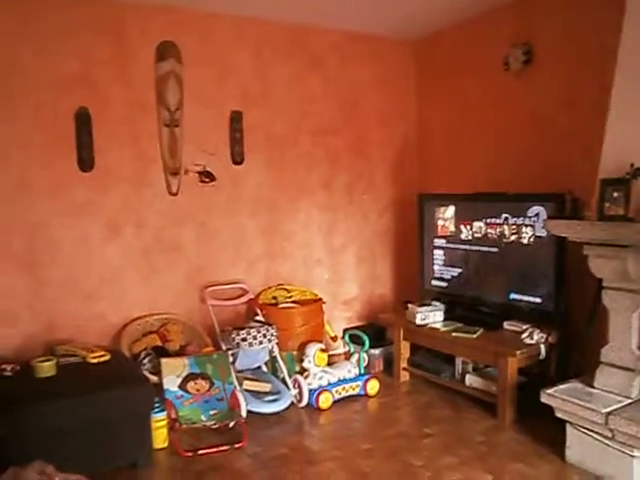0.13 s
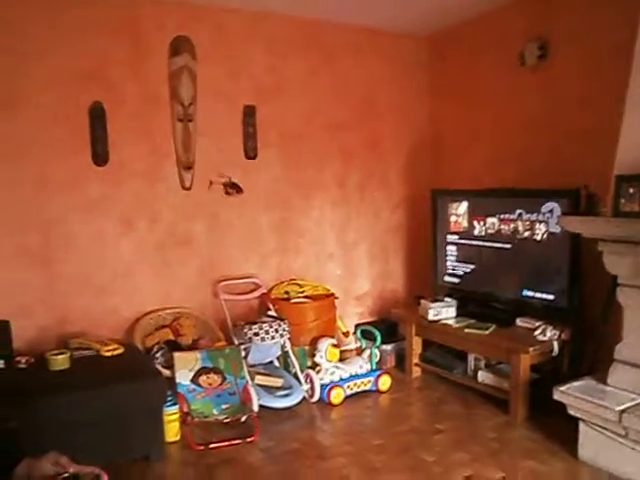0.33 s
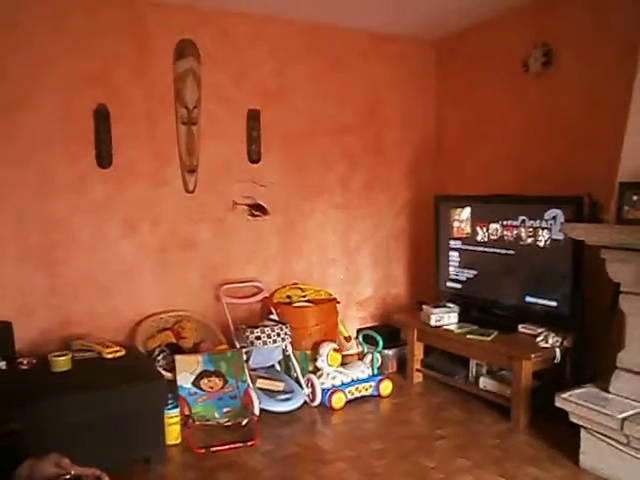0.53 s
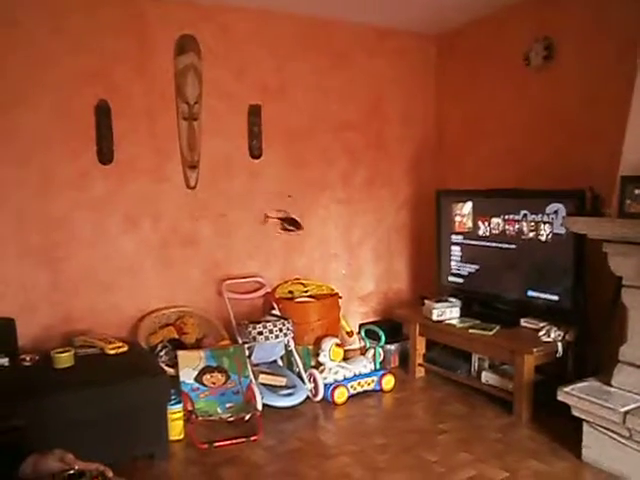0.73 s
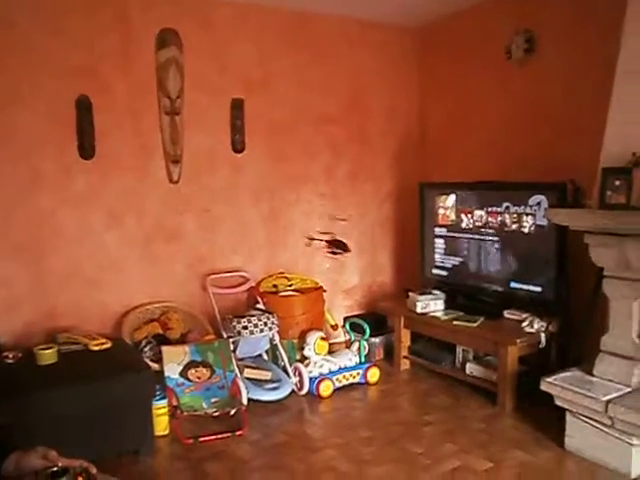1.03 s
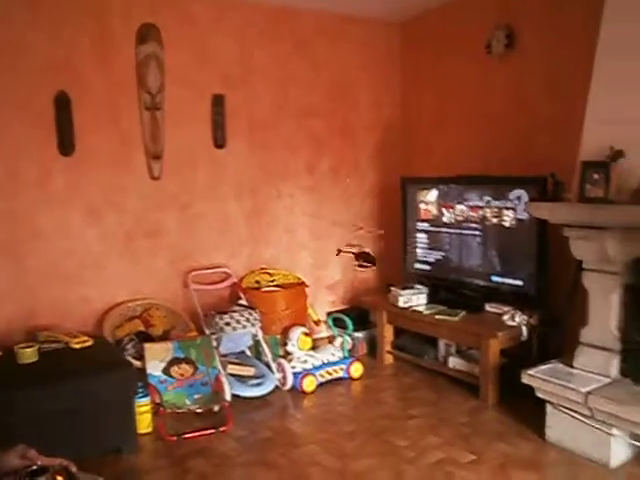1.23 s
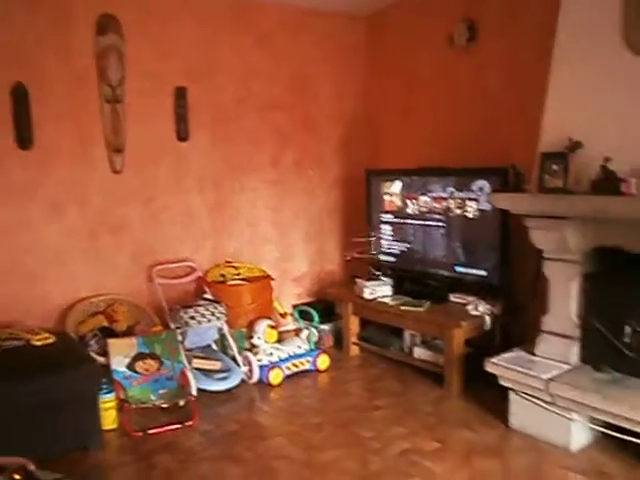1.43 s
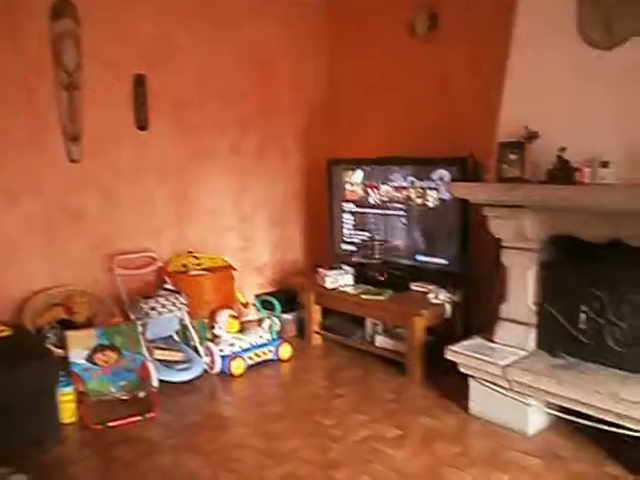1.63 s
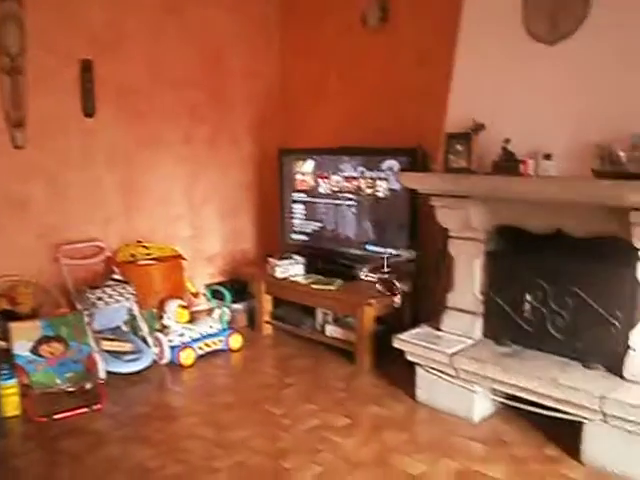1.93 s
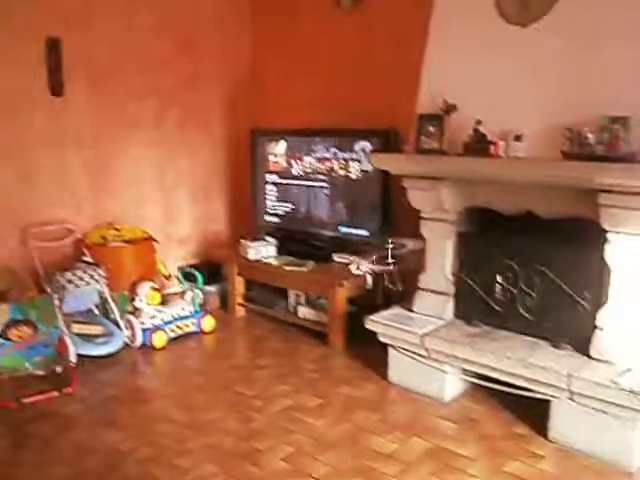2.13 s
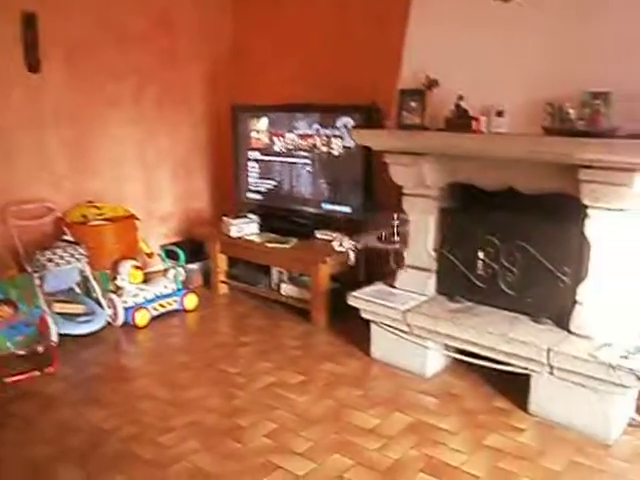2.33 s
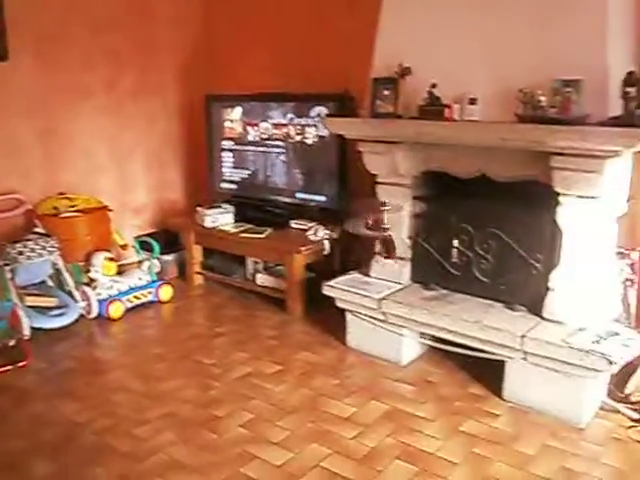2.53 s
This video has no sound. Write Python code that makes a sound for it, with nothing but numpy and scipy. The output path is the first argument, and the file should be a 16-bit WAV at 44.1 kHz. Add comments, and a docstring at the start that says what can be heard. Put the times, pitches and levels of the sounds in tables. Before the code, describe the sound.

A toy helicopter whirrs indoors with a wavering whine and a faint hum. Brief handling scuffs and ticks come close to a dull-sounding microphone, then the motor revs up a little and eases back.

```python
"""A toy helicopter flies across a tiled living room. Its main motor's pinion whines at eight times
the shaft rate, fading in and out in the room's standing waves, while a second motor hums, the blades
stir the air and the gears rasp. Brief tones swell out of the whirr. A few soft scuffs and plastic
ticks, like handling noise, sound close to a narrow-band microphone."""
import sys
import numpy as np
from scipy import signal
from scipy.fft import rfft, irfft, next_fast_len
from scipy.io import wavfile
from scipy.ndimage import map_coordinates

SR = 44100
rng = np.random.default_rng(int(sys.argv[2]) if len(sys.argv) > 2 else 0)


def to_wav(s):
    """Save 16-bit WAV."""
    ch = np.atleast_2d(s).T  # columns
    pcm = np.round(np.clip(ch, -1, 1) * 32767)  # PCM
    wavfile.write(sys.argv[1], SR, pcm.astype(np.int16))


N = 118188
T = np.arange(N) / SR

# The main motor's revs. Each row: time in seconds, shaft speed in Hz.
MAIN_SPEED = [(0, 202.4), (.55, 201), (.85, 203.2), (1.1, 203.6), (1.55, 204.7), (1.82, 204.8),
              (1.95, 212.4), (2.13, 216.9), (2.35, 214.2), (2.55, 202.3), (2.68, 198.3)]
# The whine's ride through the standing waves. Each row: time in seconds, level in dB.
WHINE_LEVEL = [(0, -48), (.12, -43.5), (.27, -39.5), (.36, -34), (.5, -46), (.59, -34.5), (.69, -43.5),
               (.74, -39.5), (.84, -46.5), (1.0, -35), (1.14, -44.5), (1.26, -38.5), (1.4, -55.5),
               (1.49, -37), (1.6, -44.5), (1.68, -37), (1.78, -49.5), (1.96, -40.5), (2.02, -43),
               (2.13, -35), (2.25, -54), (2.38, -38), (2.49, -36.5), (2.53, -44.5), (2.6, -36.5),
               (2.68, -52)]
# Faint fading tones around the whine, including a ring near 1270 Hz, here moving with motor speed.
# Each row: pitch in Hz per Hz of motor speed, level in dB.
FAINT_TONES = [(4, -55), (6.2, -51.5), (7.4, -57), (8.55, -55.5), (10.7, -58.5), (12, -55.5), (15.2, -55)]
# The second rotor's motor. Each row: time in seconds, shaft speed in Hz, fundamental's level in dB.
HUM_PATH = [(0, 204.5, -55.5), (.13, 204.5, -51.5), (.3, 204, -49), (.52, 204, -58.5), (1.0, 203.5, -60.5),
            (1.15, 203.6, -51.5), (1.76, 204, -52), (1.86, 204, -62), (1.96, 210.5, -46),
            (2.15, 213.5, -48), (2.42, 210, -45), (2.49, 208, -56.5), (2.6, 203, -47.5), (2.68, 200, -51)]
# The hum's overtones. Each row: harmonic number, level in dB against the fundamental.
HUM_OVERTONES = [(2, -5.5), (3, -5), (6, -6.5)]
# Air stirred by the blades, with the room's rumble. Each row: frequency in Hz, relative level in dB.
WASH_EQ = [(15, -31), (28, -20.5), (55, -14.5), (85, -15), (115, -10), (170, -9.5), (290, -7.5), (370, -10),
           (520, -7.5), (680, -3), (950, -1), (1300, -2), (1520, -3), (1750, -5), (1950, -10),
           (4000, -15.5)]
# The rasp of gears and brushes. Each row: frequency in Hz, relative level in dB.
RASP_EQ = [(300, -41), (1400, -2), (1950, -7), (2200, -3), (2700, -2.5), (3100, -0.5), (3400, -2),
           (3750, -1.5), (4000, -5.5), (4400, -10)]
# Soft rubs. Each row: peak time, rise and decay time constants, all in seconds, centre pitch in Hz,
# body level in dB, treble level in dB.
SCUFF_CUES = [(0.341, .008, 0.0056, 1240, -31.5, -46), (.371, .009, .022, 1220, -26, -34.5),
              (.432, 0.011, 0.023, 1002, -33.5, -41), (.798, 0.0026, 0.0041, 1200, -31, -41.5),
              (.853, 0.009, .008, 1307, -36.5, -35), (.872, 0.0027, 0.0032, 1210, -25.5, -39.5),
              (0.881, 0.0061, 0.011, 1094, -33, -27.5), (1.152, 0.016, 0.0092, 1218, -33, -47.5),
              (1.458, .012, 0.0098, 1250, -38.5, -47)]
# A scuff's pitched body. Each row: multiple of its centre pitch, relative level in dB.
SCUFF_BODY_EQ = [(.2, -53.5), (.65, -17.5), (.88, -4), (1, 1.5), (1.14, -5), (1.45, -22), (3.3, -34)]
# A scuff's scratchy top. Each row: frequency in Hz, relative level in dB.
SCUFF_TREBLE_EQ = [(200, -42), (900, -11), (1700, -3), (2600, -5), (3150, 1.5), (3700, -5.5), (4400, -16)]
# Ticks within the scuffs. Each row: start in seconds, strike level in dB.
TICK_CUES = [(.368, -21.5), (0.4301, -19)]
# The plastic they ring. Each row: pitch in Hz, level in dB against the strike, seconds to fall 60 dB.
PLASTIC_MODES = [(1070, -10.5, .022), (1317, -9, 0.03), (3000, -13, .008)]
# Tones in the whirr. Each row: peak time in seconds, half-width in seconds, pitch in Hz, level in dB.
SWELL_CUES = [(0.548, 0.11, 852, -43), (1.343, 0.053, 1755, -44.5), (1.474, 0.093, 1273, -42.5),
              (1.876, 0.078, 622, -49)]
# The microphone's treble roll-off. Each row: frequency in Hz, gain in dB.
MICROPHONE_EQ = [(3950, 0), (4150, -4.5), (4330, -14.5), (4500, -29), (4700, -55.5)]

PINION_TEETH, WHINE_JITTER_HZ = 8, 1.28
WHINE_ECHO_DB, WHINE_FLUTTER_DB = -13, 1.2
FADES_PER_S = 7  # pace at which faint tones and hum overtones drift in level
WASH_DB, RASP_DB = -35, -34.5  # halfway through, at average speed
WASH_DB_PER_S, RASP_DB_PER_S = 0.38, 1  # growth as the toy comes nearer
EFFORT_DB_PER_HZ = 0.0479  # more shaft speed, more noise
BLADE_PASSES_PER_TURN, CHOP_DEPTH, RASP_DEPTH = .27, 0.1, 0.21
SWELL_WAVER_HZ = 9
ROOM_T60_S, ROOM_DB = 0.14, -12.5


def amp(db):
    """Decibels to gain."""
    return 10 ** (np.asarray(db) / 20)


def unit(x):
    """Scale to rms 1."""
    return x / np.sqrt(np.mean(x ** 2) + 1e-20)


def automation(rows):
    """One sample-by-sample curve for each column after the time."""
    times, *columns = np.transpose(rows)
    return [np.interp(T, times, column) for column in columns]


def wobble(rate):
    """A smooth random curve through rate points a second."""
    return map_coordinates(rng.standard_normal(512), [T * rate + 2], mode="wrap")


def equalise(x, points, top_hz=SR):
    """Filter by (Hz, dB) points on a log axis, with nothing above top_hz."""
    size = next_fast_len(N + 8192)
    hz = np.fft.rfftfreq(size, 1 / SR)
    point_hz, point_db = np.transpose(points)
    gain = amp(np.interp(np.log(hz + 1), np.log(point_hz), point_db)) * (hz < top_hz)
    return irfft(rfft(x, size) * gain, size)[:N]


def noise(points, pulse=1):
    """Noise of rms 1, pulsed before it is equalised."""
    return unit(equalise(pulse * rng.standard_normal(N), points))


def angle(hz):
    """Running phase of a frequency, in radians."""
    return 2 * np.pi * np.cumsum(hz) / SR


def room(x):
    """The tiled room adds a short diffuse tail."""
    tail = rng.standard_normal(N) * np.exp(-np.log(1000) * T / ROOM_T60_S)
    return x + amp(ROOM_DB) * signal.fftconvolve(x, tail / np.linalg.norm(tail))[:N]


def fading_tone(phase):
    """A tone of rms 1 that arrives by many shifting paths through the room."""
    return unit(wobble(FADES_PER_S) * np.cos(phase) + wobble(FADES_PER_S) * np.sin(phase))


def main_motor(speed):
    """The pinion's teeth whine, blurred by the room."""
    level_db, = automation(WHINE_LEVEL)
    gain = amp(level_db + WHINE_FLUTTER_DB * wobble(40))
    tooth_hz = PINION_TEETH * speed + WHINE_JITTER_HZ * wobble(30)
    whine = gain * unit(np.sin(angle(tooth_hz)))
    echo = unit(room(whine) - whine) * whine.std() * amp(WHINE_ECHO_DB)
    return whine + echo


def faint_tones(speed):
    """Faint tones fade in and out around the whine, their pitch moving with motor speed."""
    return sum(amp(db) * fading_tone(ratio * angle(speed)) for ratio, db in FAINT_TONES)


def second_motor():
    """An unbalanced shaft hums once a turn, with a few overtones that drift in level."""
    speed, level_db = automation(HUM_PATH)
    shaft = angle(speed)
    overtones = sum(amp(db + 2.1 * wobble(FADES_PER_S)) * unit(np.sin(harmonic * shaft))
                    for harmonic, db in HUM_OVERTONES)
    return amp(level_db) * (unit(np.sin(shaft)) + overtones)


def rotors(speed):
    """Blades chop the air and gears rasp once a motor turn; both grow with speed and nearness."""
    shaft, since_middle = angle(speed), T - T.mean()
    blade_pulse = 1 + CHOP_DEPTH * np.sin(BLADE_PASSES_PER_TURN * shaft)
    gear_pulse = 1 + RASP_DEPTH * np.sin(shaft)
    wash = noise(WASH_EQ, blade_pulse) * amp(WASH_DB + WASH_DB_PER_S * since_middle)
    rasp = noise(RASP_EQ, gear_pulse) * amp(RASP_DB + RASP_DB_PER_S * since_middle)
    effort_db = EFFORT_DB_PER_HZ * (speed - speed.mean())
    flutter_db = 0.28 * wobble(10)
    return (wash + rasp) * amp(effort_db + flutter_db)


def scuffs():
    """Short rubs swell and die, each with its own pitched body under a scratchy top."""
    treble, out = noise(SCUFF_TREBLE_EQ), np.zeros(N)
    for peak, rise, decay, hz, body_db, treble_db in SCUFF_CUES:
        body = noise([(multiple * hz, db) for multiple, db in SCUFF_BODY_EQ])
        envelope = np.exp(-np.abs(T - peak) / np.where(T < peak, rise, decay))
        out += envelope * (amp(body_db) * body + amp(treble_db) * treble)
    return out


def ticks():
    """Two of the rubs catch, and the plastic rings briefly."""
    out = np.zeros(N)
    for start, strike_db in TICK_CUES:
        age = np.maximum(T - start, 0)
        for hz, mode_db, t60 in PLASTIC_MODES:
            envelope = amp(strike_db + mode_db) * np.exp(-np.log(1000) * age / t60)
            out += envelope * np.sin(2 * np.pi * hz * age)
    return out


def swells():
    """Now and then a wavering tone stands out of the whirr."""
    out = np.zeros(N)
    for peak, half_width, hz, db in SWELL_CUES:
        envelope = amp(db) * np.exp(-((T - peak) / half_width) ** 2)
        out += envelope * unit(np.sin(angle(hz + SWELL_WAVER_HZ * wobble(40))))
    return out


def scene():
    """The helicopter and the close handling noise, mixed in mono."""
    speed, = automation(MAIN_SPEED)
    whirr = main_motor(speed) + faint_tones(speed) + second_motor() + rotors(speed) + swells()
    handling = room(scuffs() + ticks())
    return (whirr + handling)[None]


def record(dry):
    """The microphone rolls off steeply above 4 kHz."""
    return np.array([equalise(channel, MICROPHONE_EQ, top_hz=4760) for channel in dry])


dry = scene()
out = record(dry)
to_wav(out)
```